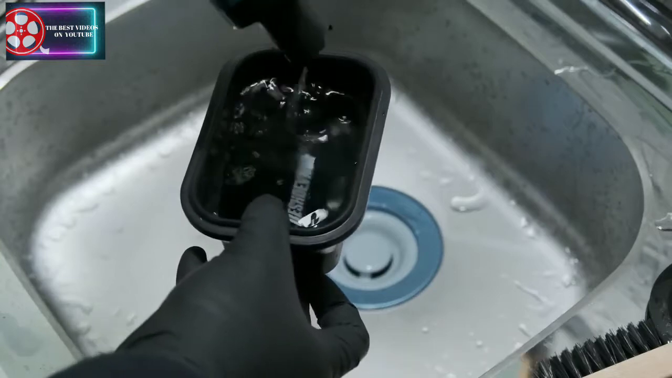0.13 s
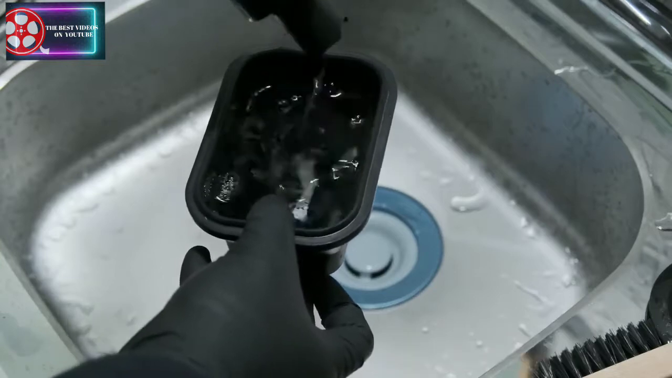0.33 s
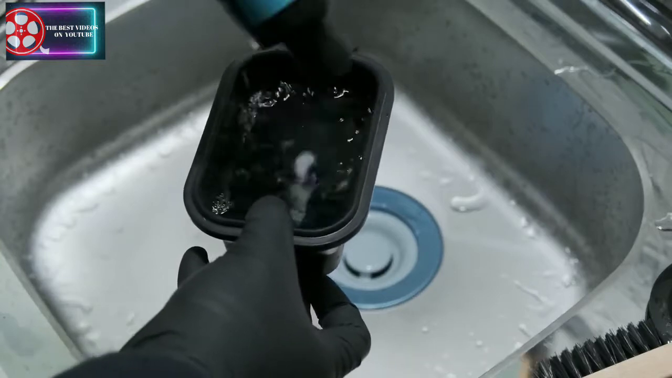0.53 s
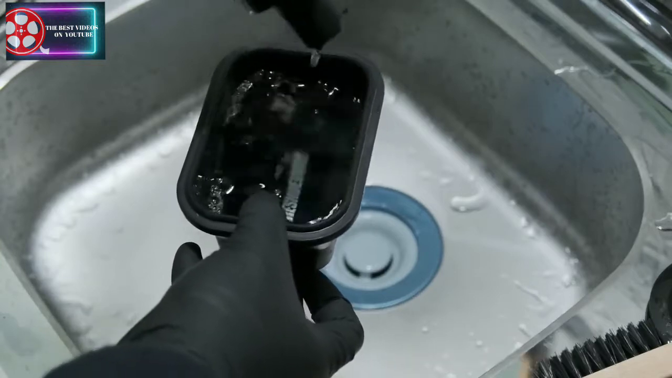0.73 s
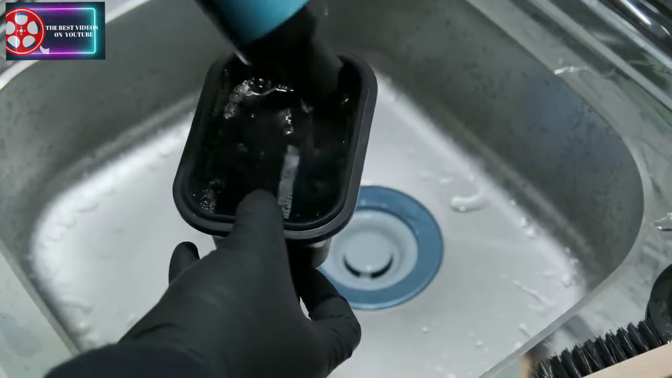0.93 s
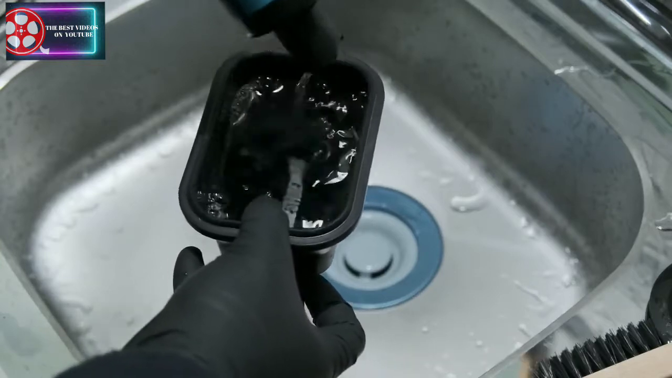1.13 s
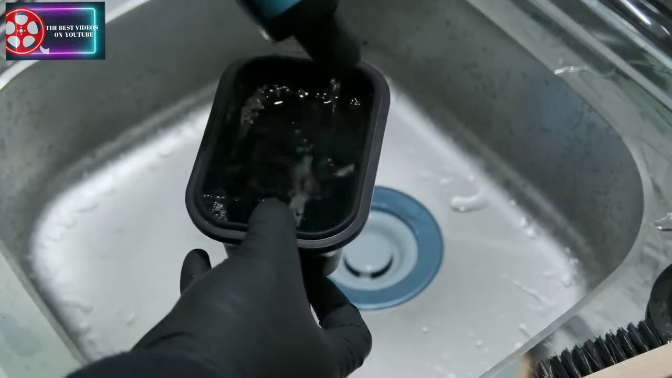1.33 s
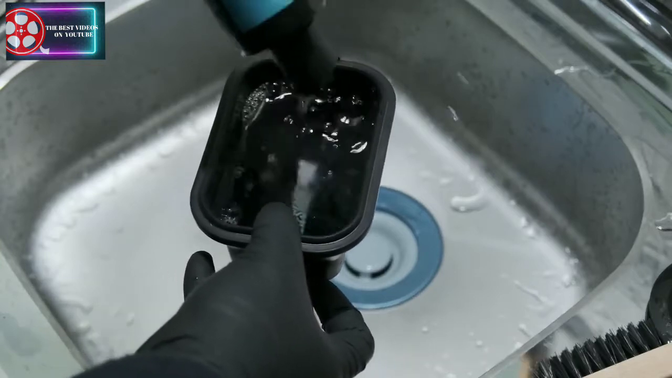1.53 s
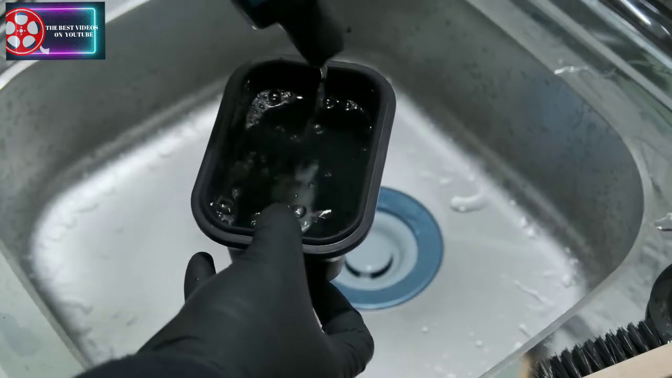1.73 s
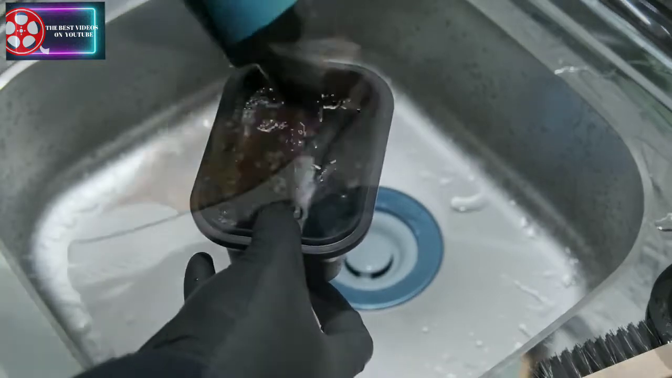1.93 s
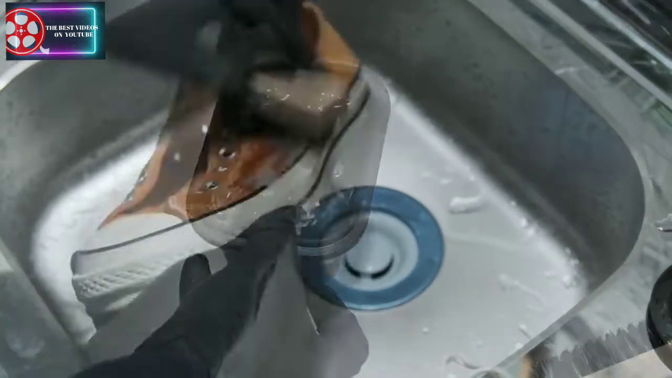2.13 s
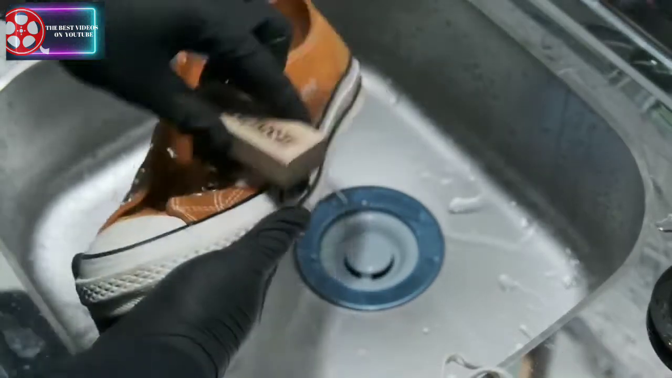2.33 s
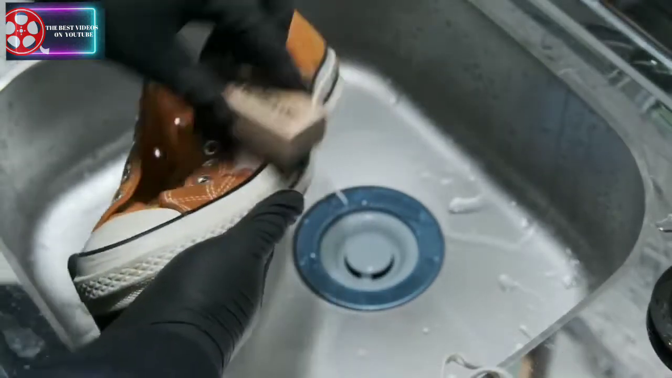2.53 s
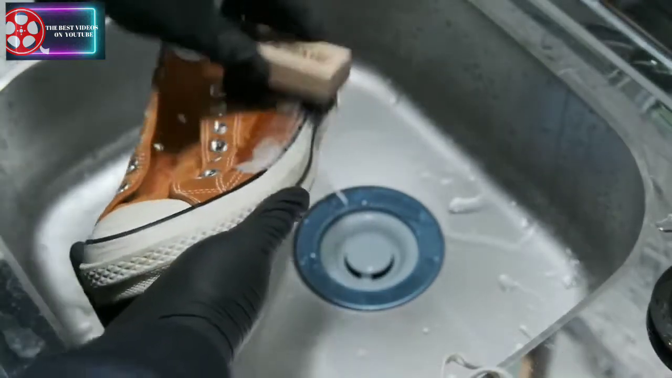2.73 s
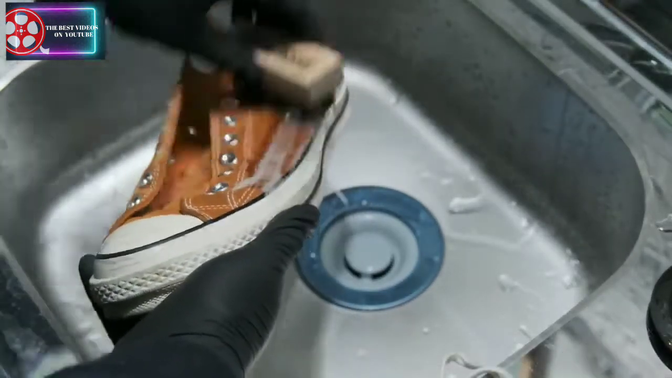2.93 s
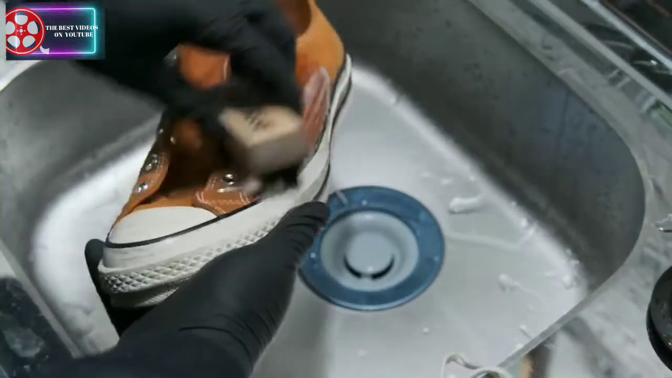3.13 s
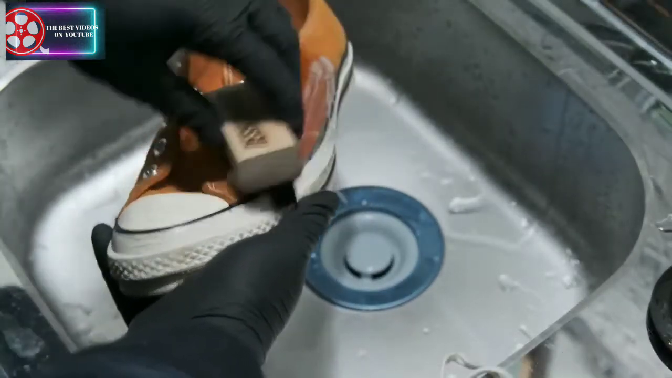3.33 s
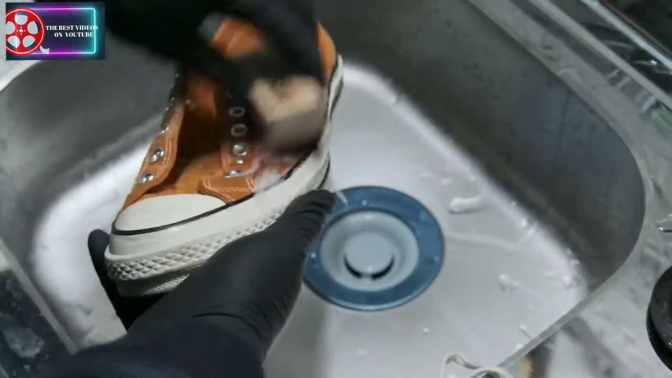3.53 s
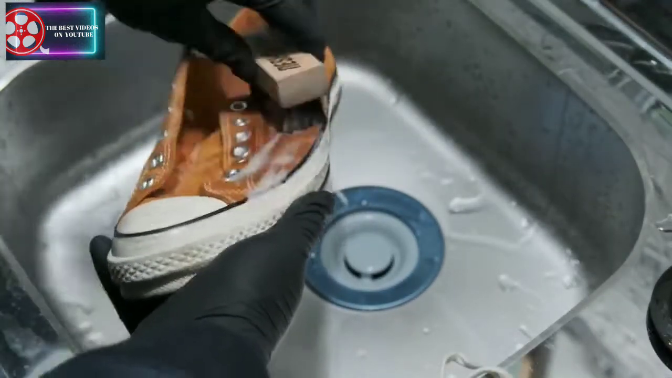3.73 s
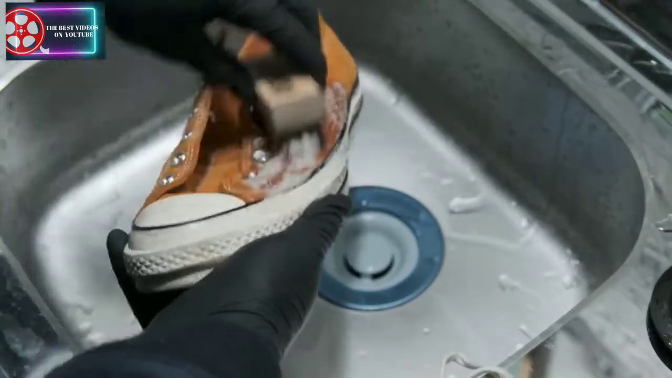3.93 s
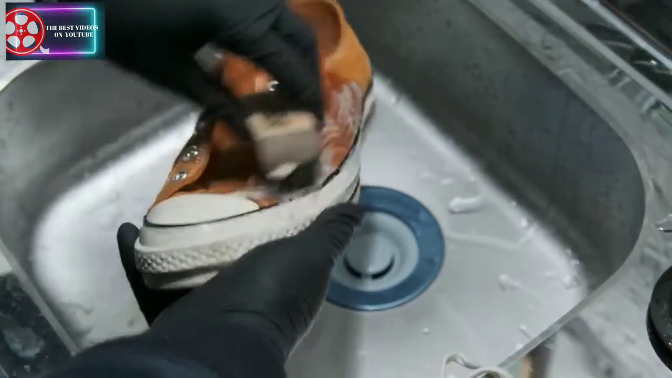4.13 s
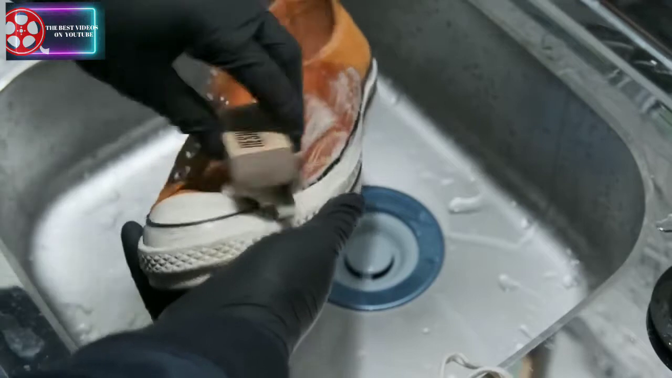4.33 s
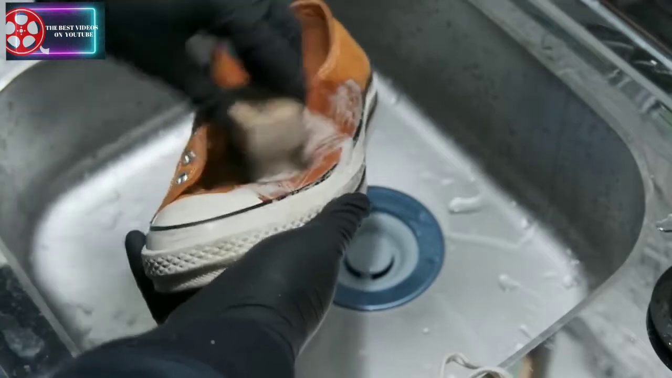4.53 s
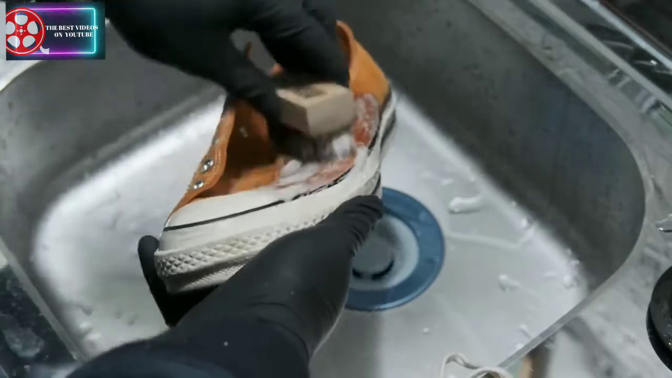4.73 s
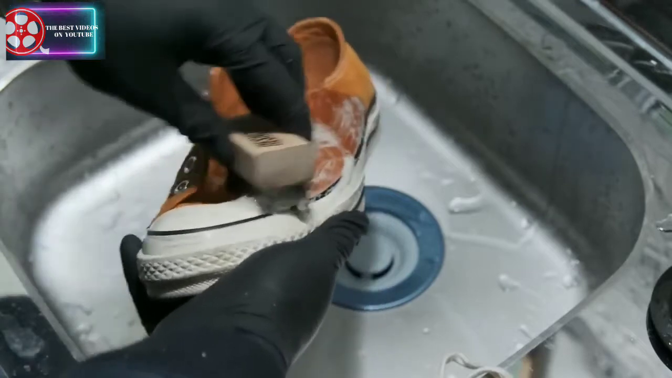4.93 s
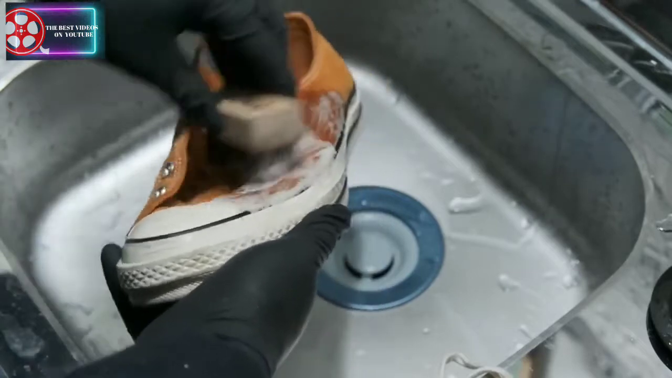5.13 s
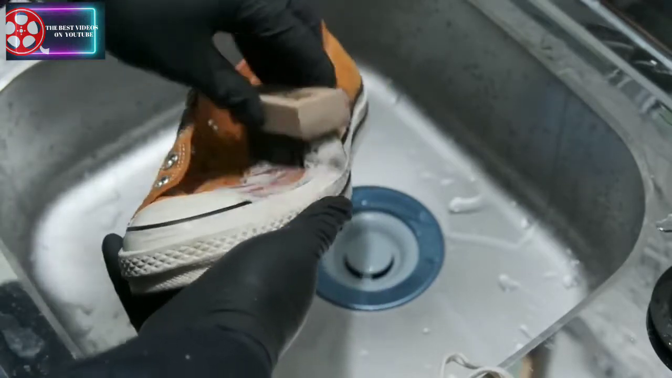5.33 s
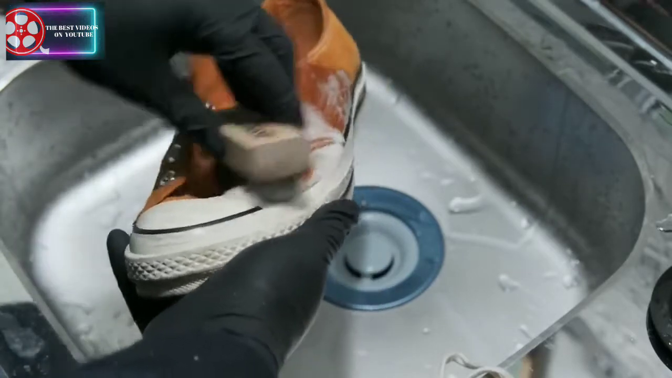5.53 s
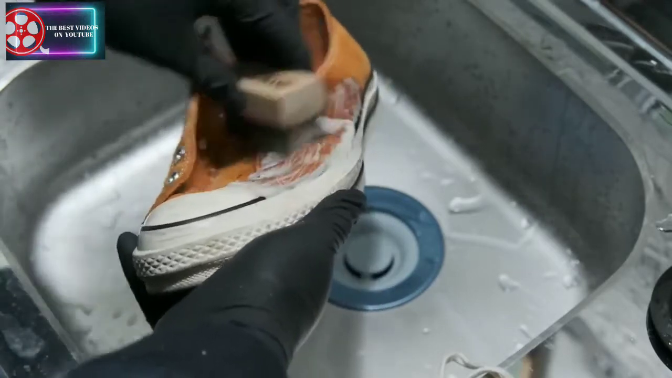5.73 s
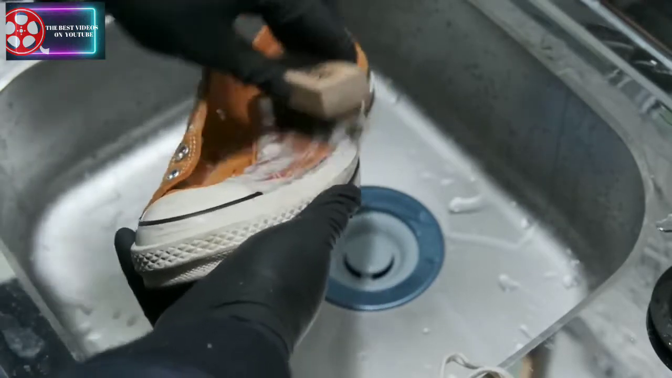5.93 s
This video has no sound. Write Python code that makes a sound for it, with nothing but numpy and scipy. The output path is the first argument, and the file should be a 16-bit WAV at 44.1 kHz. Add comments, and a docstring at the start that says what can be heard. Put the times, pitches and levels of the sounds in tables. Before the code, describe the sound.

Small drips and plops in a tub of water, followed by fast, close back-and-forth brushing on a wet shoe with fizzing foam.

```python
"""A bristle brush scrubs a wet suede sneaker in a steel sink, close to a single microphone.
It pushes and pulls about eight times a second, slowing and circling as the lather builds:
bristles flick over the nap, foam fizzes, the hollow shoe rumbles, and the basin colours it all.
For two seconds beforehand, cleaner is squirted into a small plastic tub of water over the sink:
drops patter and ring as tiny bubbles. All sits in the centre, with the faint air of a small room behind."""
import sys
import numpy as np
from scipy import signal
from scipy.fft import rfft, irfft
from scipy.io import wavfile
from scipy.ndimage import uniform_filter1d

SR = 44100
rng = np.random.default_rng(int(sys.argv[2]) if len(sys.argv) > 2 else 0)


def persist_wave(psi):
    """Save psi, clipped to +-1, as 16-bit WAV."""
    counts = np.round(np.clip(psi, -1, 1) * 32767).astype(np.int16)
    wavfile.write(sys.argv[1], SR, np.atleast_2d(counts).T)


N = 263718
TIME = np.arange(N) / SR

# air of the room behind the sink: f/Hz, level/dB
ROOM_AIR = [(18, -30), (30, -13), (48, -14), (192, -3), (270, -5), (332, 0.5), (575, 1), (1110, 1),
            (1870, -1.5), (2240, 1), (5590, -3), (13600, -3.5), (15500, -9)]
# swarms of tiny bubbles in stirred water: t/s, length/s, level/dB, middle f/Hz
SWARMS = [(.0, 0.048, -55, 2080), (0.201, 0.07, -48.5, 2610), (0.366, 0.037, -50.5, 5000),
          (0.564, .11, -50, 2360), (0.914, 0.054, -59, 694), (1.098, 0.054, -64, 3800),
          (1.487, 0.086, -50, 1860), (1.704, 0.087, -55.5, 4200), (1.743, 0.095, -52.5, 750),
          (1.785, 0.047, -57, 2040), (1.913, 0.056, -55.5, 5050)]
# drops and knocks on the tub: t/s, level/dB, tilt/(dB per octave)
TUB_TAPS = [(.098, -31.5, -10), (.418, -29.5, -7), (0.5572, -14.5, -1), (.645, -34.5, -2),
            (.678, -38.5, -2), (.820, -42, -20), (0.884, -42.5, -25), (1.471, -34, 0), (2.053, -36.5, -5)]
# modes of the plastic tub: f/Hz, level/dB, t60/s
TUB_MODES = [(696, -19, 0.041), (931, -3.5, 0.034), (1090, -9, 0.03), (1235, 5.5, 0.033), (1390, 6.5, 0.02),
             (1750, -7.5, 0.076), (1936, -2, 0.063), (2600, -6, 0.035), (3370, -6, 0.03), (3650, 2.5, 0.03),
             (4080, 2, 0.046), (4320, -2, 0.042), (4590, 0, 0.048), (5500, -23, 0.046)]
# bubbles trapped by drops, later foam bursts: t/s, f/Hz, level/dB, glide/share of f, snap/dB re ring
CLEAR_BUBBLES = [(0.1636, 3140, -28, 1.5, -5), (0.179, 1288, -26, 0.7, 6), (.189, 1280, -33, .25, -20),
                 (0.225, 3620, -29.5, 0.8, -3.5), (0.3592, 1390, -37.5, 1.3, -4),
                 (.368, 1916, -32, 3.5, -7), (.377, 4360, -20.5, 1, -7.5), (0.4177, 2560, -30, 0, -9),
                 (0.418, 9760, -35.5, 0.7, 2), (1.012, 3300, -45, .1, -15), (1.0695, 10900, -39, .3, -4),
                 (1.091, 2600, -40, 1.3, -13), (1.239, 2170, -36, 0.2, 0), (1.2765, 4350, -31.5, 0, 0.5),
                 (1.289, 2265, -39.5, 0, -11), (1.310, 6270, -26, 1.3, -4), (1.4265, 10550, -25, 0.5, -11),
                 (1.429, 6580, -20.5, 0.5, -6.5), (1.4707, 1370, -14, 0.4, -11),
                 (1.609, 3840, -44.5, 1, -10), (1.745, 7940, -33, .2, 0.5), (1.790, 1290, -41, 0.5, -12),
                 (1.799, 4620, -30, -0.5, -4), (1.818, 1850, -37, -0.6, -16),
                 (1.828, 2230, -37.5, 0.7, -14), (1.845, 11100, -33, 0.5, -20),
                 (1.9044, 9100, -26, 0.5, -21), (1.931, 4340, -28, 0.7, -2), (1.9682, 4630, -38.5, .6, -2),
                 (2.053, 4270, -32, -0.2, -7), (4.433, 8460, -21, -.2, -9), (5.022, 8400, -24.5, 0.3, -12),
                 (5.938, 8500, -18, 1.5, -6)]
# colour of the drips at the microphone: f/Hz, level/dB
DRIP_SPECTRUM = [(50, -25), (250, -9), (600, -4.5), (900, -1.5), (16000, 1.5)]
# resonances of the steel basin: f/Hz, width/Hz, level/dB
BASIN_PEAKS = [(620, 70, 5.5), (1007, 40, 9.5), (1150, 28, 1), (1316, 25, 5), (1425, 50, 4), (1654, 54, 7),
               (1770, 23, 6), (1927, 83, 9.5), (2132, 54, 7.5), (2530, 39, 4), (3050, 51, 3),
               (4082, 46, -1.5), (4570, 67, -3), (6480, 110, 4)]
# modes of the hollow shoe: f/Hz, level/dB, t60/s
SHOE_MODES = [(160, -9, 0.14), (288, 3.5, 0.11), (620, 6, 0.1)]
# the brush shoves the shoe: t/s, level/dB
SHOVES = [(3.902, -52), (4.128, -42.5), (4.351, -47), (4.40, -47.5), (4.64, -46)]
# the brush bumps the shoe: t/s, level/dB, t60/s
BRUSH_BUMPS = [(2.148, -35, 0.065), (4.917, -15.5, 0.023), (4.936, -28, 0.042), (4.962, -22, 0.054),
               (5.248, -27, 0.035)]
# colours of shoe, fizz and bristles in thin and in thick lather: f/Hz, level/dB
SHOE_THIN = [(60, -26), (190, -46), (280, -14), (370, -28), (500, 0.5), (620, 0), (800, 4), (1050, 2.5),
             (1500, -4), (3000, -17.5)]
SHOE_THICK = [(60, -41), (150, -20.5), (210, -20), (290, -9.5), (370, -7.5), (520, -1.5), (630, -1.5),
              (780, -3.5), (1050, -2.5), (1500, 0), (3000, -23.5)]
FOAM_THIN = [(1500, -68), (3200, 6), (4800, 3.5), (6500, 1), (9500, 1.5), (12000, -0.5), (13700, -1.5),
             (15500, -18.5)]
FOAM_THICK = [(1500, -31), (3200, -20), (4800, -3), (6500, -0.5), (9500, 0.5), (12000, -2), (13700, -11.5),
              (15500, -27)]
BRISTLE_THIN = [(200, -76), (500, -41.5), (900, -16), (1300, -11.5), (1800, -8), (2300, -3), (2650, 3.5),
                (3200, -3.5), (4600, -2), (5600, -7.5), (7000, -12.5), (11000, -15), (16000, -51)]
BRISTLE_THICK = [(200, -51), (500, -33), (900, -15), (1300, -7), (1800, -5.5), (2300, -4), (2650, 1),
                 (3100, -3), (4600, -4), (5600, -8.5), (7000, -14.5), (11000, -27.5), (16000, -40)]
# foam under the brush: t/s, lather/(0-1)
LATHER_BUILD = [(2.2, 0), (3.9, 0.09), (4.4, 0.4), (4.9, 0.59), (5.9, 0.7)]
# the hand goes from straight strokes to circles: t/s, circling/(0-1)
HAND_CIRCLING = [(4.08, 0.21), (4.34, 0.66), (4.52, 0.57), (4.8, 0.17), (4.98, 0.83), (5.35, 1),
                 (5.9, 0.79)]
# brush strokes, push and pull in turn, each lasting until the next: t/s, level/dB
BRUSH_STROKES = [(2.161, -25.5), (2.284, -24.5), (2.413, -26.5), (2.534, -24.5), (2.669, -24),
                 (2.794, -26.5), (2.925, -23.5), (3.051, -24.5), (3.194, -24), (3.311, -24.5), (3.446, -24),
                 (3.567, -25), (3.699, -22.5), (3.82, -22.5), (3.944, -24), (4.064, -24), (4.172, -26),
                 (4.314, -26), (4.426, -22.5), (4.555, -29.5), (4.682, -25), (4.875, -39), (5.004, -28),
                 (5.176, -34), (5.287, -29), (5.477, -33), (5.596, -27), (5.789, -30), (5.91, -25)]

SCRUB_START_S, LAST_STROKE_END_S = BRUSH_STROKES[0][0], 6.07
SIDE_SIGNS = np.array([[1], [-1]])  # left, right


def undb(db):
    """Decibels to gain."""
    return 10 ** (np.asarray(db) / 20)


def unit(x):
    """Scale to rms 1."""
    return x / np.sqrt(np.mean(x ** 2))


def add(track, s, sound):
    """Mix a sound into a track at time s."""
    start = max(int(s * SR), 0)
    track[start:start + len(sound)] += sound[:max(N - start, 0)]


def control(points):
    """A 0-1 curve through (t/s, value) points."""
    return np.clip(np.interp(TIME, *np.transpose(points)), 0, 1)


def fade(t, t60):
    """Exponential decay, 60 dB down after t60."""
    return np.exp(-np.log(1000) * t / t60)


def wander(rate):
    """Random drift of rms 1 through rate points a second."""
    return unit(np.interp(TIME * rate, np.arange(N // 10), rng.standard_normal(N // 10)))


def flicks(rate, spread_db=0):
    """Random clicks, rate a second, of uneven size; their mean power is 1 at any rate."""
    chance = np.clip(rate / SR, 1e-4, 1)
    size = unit(rng.standard_normal(N) * undb(spread_db * rng.standard_normal(N)))
    return (rng.random(N) < chance) * size / np.sqrt(chance)


def colour(x, points, peaks=(), size=8192):
    """Causal filter with a smooth spectrum and resonances on top of it; white noise keeps its level."""
    hz = np.arange(size // 2 + 1) * SR / size
    knot_hz, knot_db = np.transpose(points)
    db = np.interp(np.log(hz + 1), np.log(knot_hz), knot_db)
    for centre, width, height in peaks:
        db = db + height / (1 + (2 * (hz - centre) / width) ** 2)
    cepstrum = irfft(np.log(undb(db)))
    cepstrum[1:size // 2] *= 2  # fold to minimum phase
    cepstrum[size // 2 + 1:] = 0
    response = irfft(np.exp(rfft(cepstrum)))
    return signal.fftconvolve(x, response / np.sqrt(np.sum(response ** 2)))[:N]


def room_tone(level_db=-59, side_db=-10):
    """Faint steady air of the room, much the same left and right."""
    mid, side = (colour(rng.standard_normal(N), ROOM_AIR) for _ in range(2))
    return undb(level_db) * (mid + undb(side_db) * side * SIDE_SIGNS)


def reflections(x, t60, gap_s):
    """Dense echoes reach the microphone from the steel walls and the small room around them."""
    t = TIME[:SR // 2]
    tail = rng.standard_normal(len(t)) * fade(t, t60) * (t > gap_s)
    return signal.fftconvolve(x, tail / np.sqrt(np.sum(tail ** 2)))[:N]


def sloshes(spread_octaves=0.64, cycles=16, rise=0.13, spread_db=4, fall_db=13.7, count=50):
    """Stirred water closes over many small bubbles, the early ones loudest, each with its own pitch."""
    out, t = np.zeros(N), TIME[:SR // 20]
    for s, length, db, middle_hz in SWARMS:
        swarm = np.zeros(N)
        for when, (octave, size) in zip(rng.random(count), rng.standard_normal((count, 2))):
            hz = min(middle_hz * 2 ** (spread_octaves * octave), SR / 4)
            pitch = hz * (1 + rise * np.minimum(t * hz / cycles, 1))
            ring = np.sin(2 * np.pi * np.cumsum(pitch) / SR) * fade(t, cycles / hz)
            add(swarm, s + length * when, undb(spread_db * size - fall_db * when) * ring)
        out += undb(db) * swarm / np.sqrt(np.sum(swarm ** 2) / (length * SR))
    return out


def tub_taps(splat_db=7, splat_t60=0.064):
    """Each tap rings the walls of the tub and splats on the water; soft ones reach only the low modes."""
    out, t = np.zeros(N), TIME[:SR // 4]
    hz, db, t60 = np.transpose(TUB_MODES)[:, :, None]
    splat_band = signal.butter(2, [1000, 5400], "bandpass", fs=SR, output="sos")
    for s, level_db, tilt_db in TUB_TAPS:
        phase = 2 * np.pi * (hz * t + rng.random(hz.shape))
        modes = undb(db + tilt_db * np.log2(hz / 1400)) * fade(t, t60) * np.sin(phase)
        splat = fade(t, splat_t60) * signal.sosfilt(splat_band, rng.standard_normal(len(t)))
        tap = modes.sum(axis=0) + undb(splat_db + tilt_db) * splat
        add(out, s, undb(level_db) * tap / np.abs(tap).max())
    return out


def bubble(hz, db, glide, snap_db, ring_cycles=84, attack_cycles=0.33, snap_t60=0.011):
    """A film snaps and the trapped air rings, gliding as it climbs or sinks; small bubbles die fast."""
    t = TIME[:SR // 5]
    halvings = max(db + 29.5, 0) / 14  # harder-struck bubbles lie nearer the surface and burst sooner
    t60 = ring_cycles / hz / 2 ** halvings
    pitch = hz * (1 + glide * np.minimum(t / t60, 1))
    attack = 1 - np.exp(-t * hz / attack_cycles)
    ring = attack * fade(t, t60) * np.sin(2 * np.pi * np.cumsum(pitch) / SR)
    band = signal.butter(2, [.7 * hz, min(2.5 * hz, .45 * SR)], "bandpass", fs=SR, output="sos")
    snap = signal.sosfilt(band, fade(t, snap_t60) * rng.standard_normal(len(t)))
    return undb(db) * (ring + undb(snap_db) * snap)


def bubbles(stray_start_s=1.68, stray_span_s=0.3, stray_hz=5200, stray_db=-50.5, strays=8):
    """Single bubbles ring out clearly, with a few faint strays while the water is stirred."""
    out = np.zeros(N)
    for s, hz, db, glide, snap_db in CLEAR_BUBBLES:
        add(out, s, bubble(hz, db, glide, snap_db))
    for when, octave, size in rng.random((strays, 3)):
        hz = stray_hz * 2 ** (2 * octave - 1)
        db = stray_db + 3 * (2 * size - 1)
        add(out, stray_start_s + when * stray_span_s, bubble(hz, db, glide=.3, snap_db=-2))
    return out


def shoe_thuds(attack_s=0.01, detune=0.054):
    """Now and then the brush head shoves the shoe, and a hollow thud answers."""
    out, t = np.zeros(N), TIME[:SR // 4]
    hz, db, t60 = np.transpose(SHOE_MODES)[:, :, None]
    for s, level_db in SHOVES:
        pitch = hz * (1 + detune * rng.standard_normal(hz.shape))
        modes = undb(db) * fade(t, t60) * np.sin(2 * np.pi * pitch * t)
        add(out, s, undb(level_db) * (1 - np.exp(-t / attack_s)) * modes.sum(axis=0))
    return out


def brush_bumps(shoe_db=-10, bristle_db=-12):
    """All tufts land at once: a short burst through shoe and bristles."""
    bursts, t = np.zeros(N), TIME[:SR // 5]
    for s, db, t60 in BRUSH_BUMPS:
        add(bursts, s, undb(db) * fade(t, t60) * rng.standard_normal(len(t)))
    shoe = undb(shoe_db) * colour(bursts, SHOE_THICK, BASIN_PEAKS)
    return shoe + undb(bristle_db) * colour(bursts, BRISTLE_THICK, BASIN_PEAKS)


def stroke_motion(lead_s, bend, stuck_db=-6, stuck_share=.19, release_share=0.016):
    """The hand drives the brush to and fro: swell (0-1), level/dB and direction (push 1, pull -1)."""
    starts, stroke_db = np.transpose(BRUSH_STROKES)
    place = np.interp(TIME + lead_s, np.append(starts, LAST_STROKE_END_S), np.arange(len(starts) + 1))
    stroke = np.minimum(place.astype(int), len(starts) - 1)
    progress = place - stroke
    push, circling = stroke % 2 == 0, control(HAND_CIRCLING)
    crest = np.where(push, .51, .44)  # fastest point as a share of the stroke
    warp = np.log(.5) / np.log(crest)
    sharpness = 2.3 * (1 - circling) + .75 * circling  # straight strokes stop dead at each turn
    speed = np.abs(np.sin(np.pi * progress ** warp)) ** sharpness
    swell = np.tanh(bend * speed) / np.tanh(bend)  # at full speed the bristles lie over, no louder
    stuck = .5 + .5 * np.tanh((stuck_share - progress) / release_share)  # they bend, then break loose
    swell, level_db, direction = uniform_filter1d([swell, stroke_db[stroke], 2. * push - 1], size=600)
    return swell * undb(stuck_db * stuck * (1 - circling)), level_db, direction


def scrub_in_basin(clicks, thin, thick, lather):
    """Once the brush lands, its clicks ring the basin, passing from thin to thick lather in colour."""
    contact = clicks * (TIME > SCRUB_START_S)
    barely_soaped = colour(contact, thin, BASIN_PEAKS)
    lathered = colour(contact, thick, BASIN_PEAKS)
    return (1 - lather) * barely_soaped + lather * lathered


def shifting_tufts(x, spread_db):
    """The tufts in contact keep changing, so patches of the spectrum swell and sink."""
    bins = signal.stft(x, nperseg=512)[2]
    patches = uniform_filter1d(rng.standard_normal(bins.shape), size=7, axis=0)
    patches = uniform_filter1d(patches, size=9, axis=1)
    return signal.istft(bins * undb(spread_db * unit(patches)), nperseg=512)[1][:N]


def shoe_rumble(lather, base_db=-47.5, foam_db=8, judder_db=2.5):
    """Tufts judder over seams and eyelets and shake the shoe; in foam it squelches through the turns."""
    swell, _, _ = stroke_motion(lead_s=0, bend=3.2)
    held = 0.11 + 0.45 * lather  # share of the force that lasts through a turn
    level_db = base_db + foam_db * np.sqrt(lather) + judder_db * wander(55)
    force = (held + (1 - held) * swell ** 0.23) * undb(level_db)
    return scrub_in_basin(flicks(3000, spread_db=2) * force, SHOE_THIN, SHOE_THICK, lather)


def foam_fizz(lather, base_db=-31, firm_stroke_db=-24.5, foam_db=-12.5, push_db=4.5, soak_s=0.46):
    """Wet tips tear the soap film into tiny bursts; thick foam dulls them."""
    swell, stroke_db, direction = stroke_motion(lead_s=0.0055, bend=1.18)
    level_db = base_db + 0.62 * (stroke_db - firm_stroke_db) + foam_db * lather ** 2
    nap = np.exp(-np.maximum(TIME - SCRUB_START_S, 0) / soak_s)
    level_db += push_db * nap * direction  # pushes against the nap fizz more, until it is soaked
    floor_db = -57 + 9 * control(HAND_CIRCLING)
    force = np.hypot(swell ** 0.99 * undb(level_db), undb(floor_db))
    bursts = flicks(4500 + 22000 * swell) * undb(1.56 * wander(120))
    return shifting_tufts(scrub_in_basin(bursts * force, FOAM_THIN, FOAM_THICK, lather), spread_db=1)


def bristles(lather, trim_db=-0.64, foam_db=0.5):
    """Bristles catch on the nap and flick free, more of them at speed; whole tufts slip together."""
    swell, stroke_db, _ = stroke_motion(lead_s=0.00041, bend=0.98)
    floor_db = -46 + 5 * control(HAND_CIRCLING)
    force = np.hypot(swell * undb(stroke_db + trim_db + foam_db * lather), undb(floor_db))
    slip_db = 0.7 - 0.3 * lather
    clicks = flicks(5000 + 22000 * swell, spread_db=1.6) * undb(slip_db * wander(170))
    rasp = scrub_in_basin(clicks * force, BRISTLE_THIN, BRISTLE_THICK, lather)
    return shifting_tufts(rasp, spread_db=2)


def scene(drip_echo_db=-7, scrub_echo_db=-14, scrub_db=-0.06, side_db=-20):
    """Close up at the sink: drips, then scrubbing, both centred; a trace of treble spreads sideways."""
    lather = control(LATHER_BUILD)
    drips = colour(bubbles() + tub_taps() + sloshes(), DRIP_SPECTRUM)
    scrub = bristles(lather) + foam_fizz(lather) + shoe_rumble(lather) + shoe_thuds() + brush_bumps()
    scrub *= undb(scrub_db)
    drip_echo = reflections(drips, t60=0.12, gap_s=0.00325)
    drip_echo = colour(drip_echo, [(1000, -2), (5000, -2), (12000, -3)])
    scrub_echo = reflections(scrub, t60=0.17, gap_s=0.0034)
    mid = drips + undb(drip_echo_db) * drip_echo + scrub + undb(scrub_echo_db) * scrub_echo
    side = reflections(mid, t60=0.019, gap_s=0)
    side = colour(side, [(300, -9), (1000, -38.5), (2500, -59.5), (8000, -32), (13000, 27.5)])
    return mid + undb(side_db) * side * SIDE_SIGNS + room_tone()


def record(dry, top_hz=15900):
    """The recorder cuts the top steeply."""
    return signal.sosfilt(signal.ellip(10, .2, 80, top_hz, fs=SR, output="sos"), dry)


dry = scene()
out = record(dry)
persist_wave(out)
```